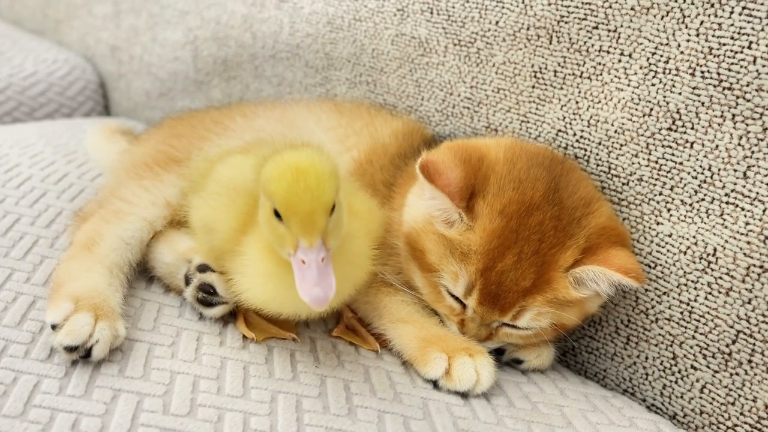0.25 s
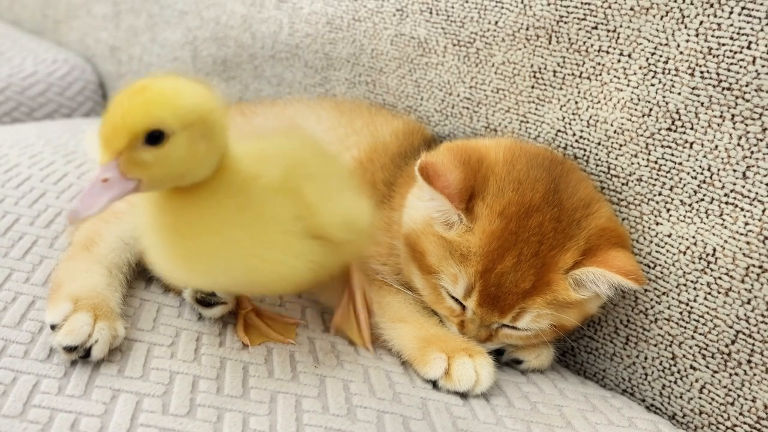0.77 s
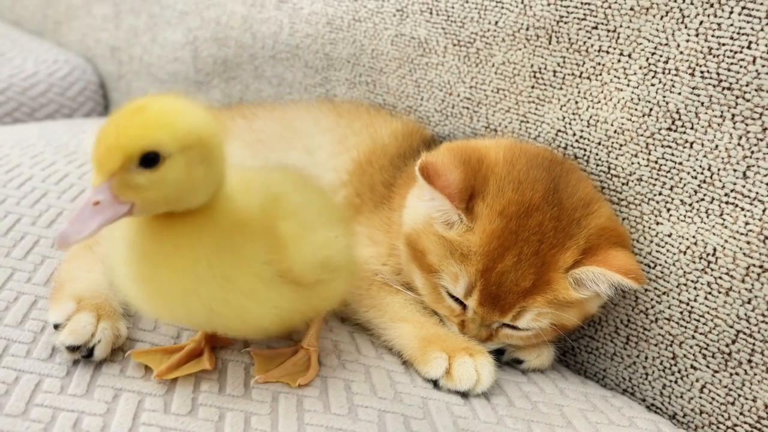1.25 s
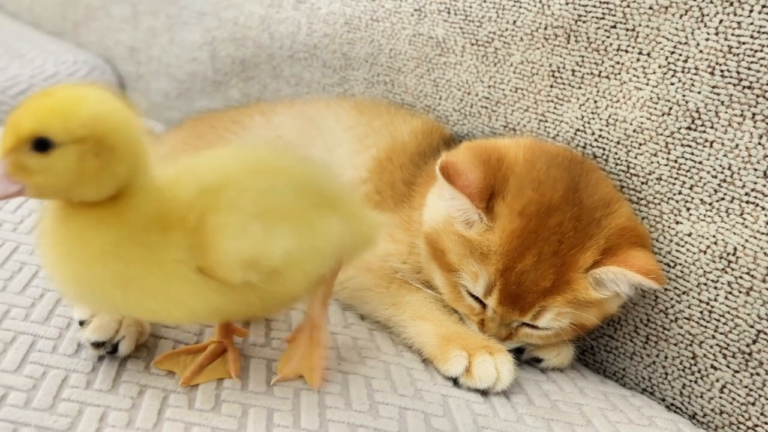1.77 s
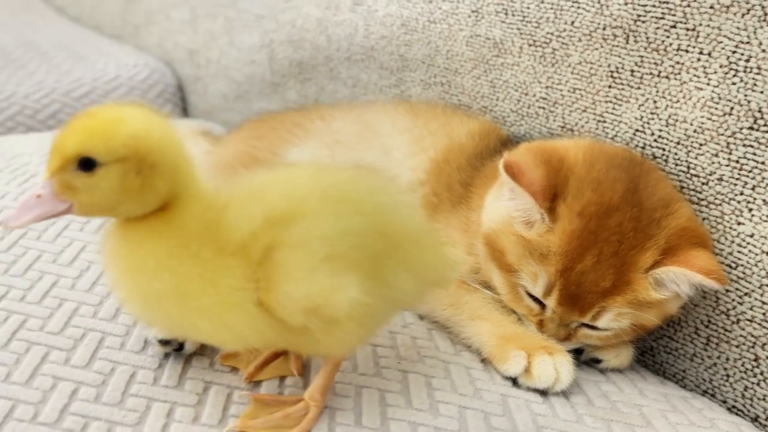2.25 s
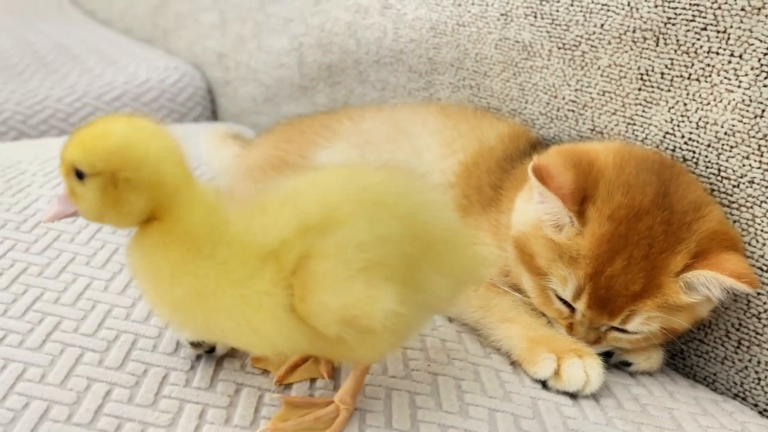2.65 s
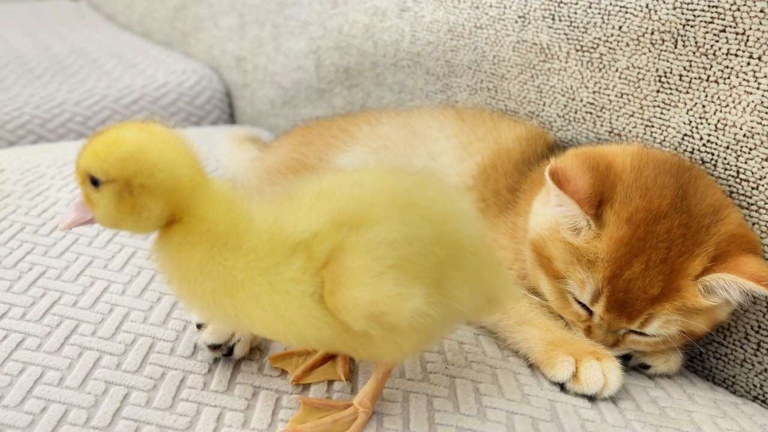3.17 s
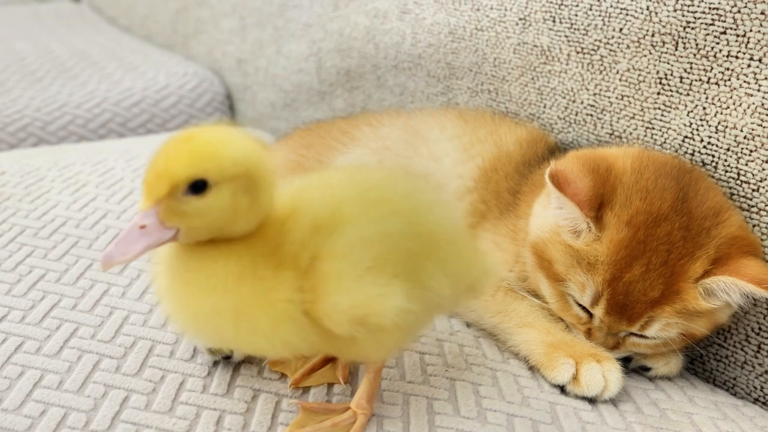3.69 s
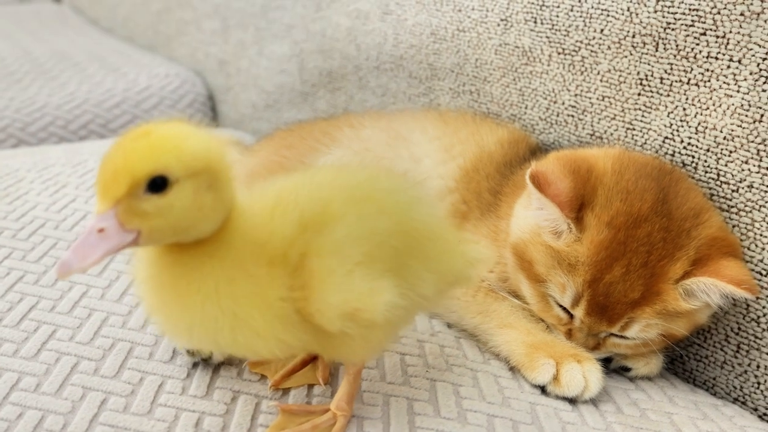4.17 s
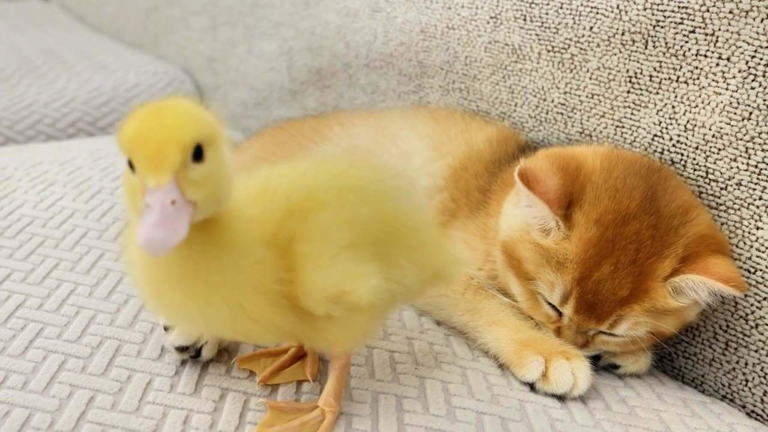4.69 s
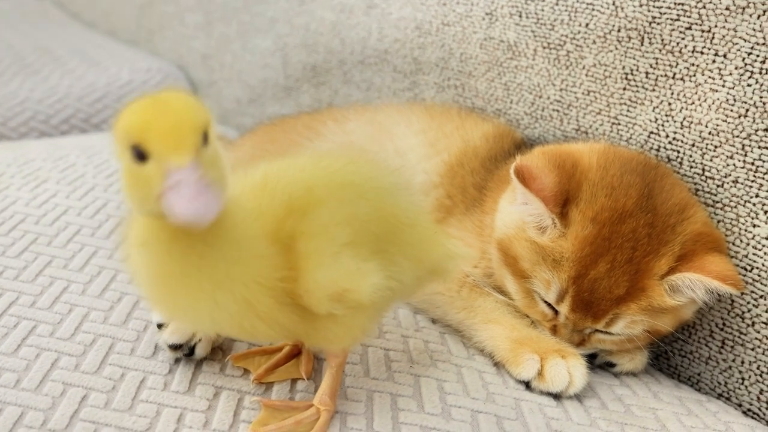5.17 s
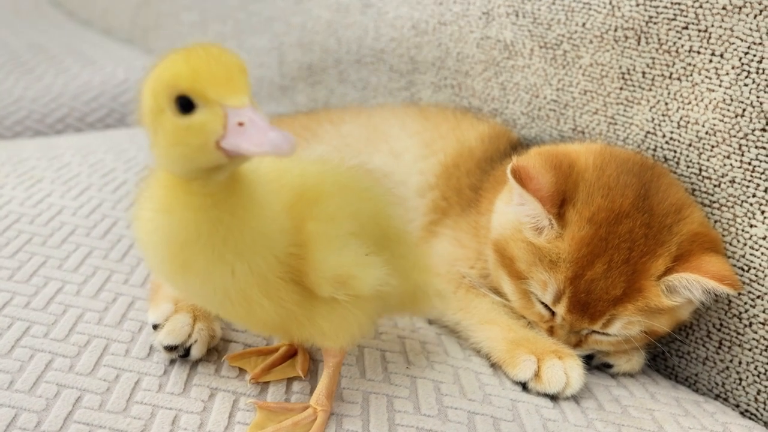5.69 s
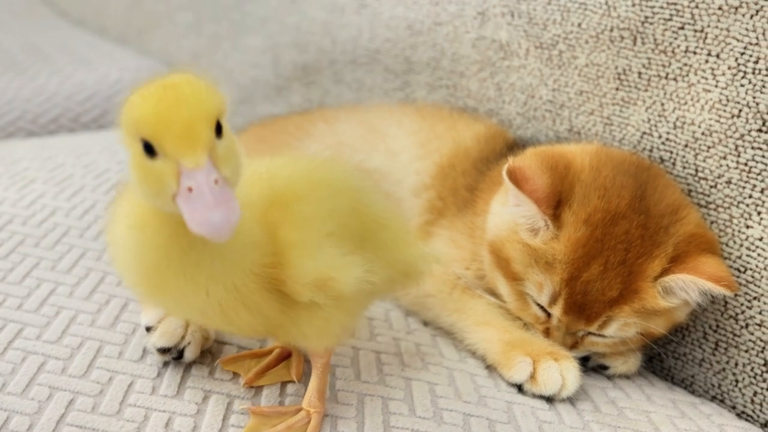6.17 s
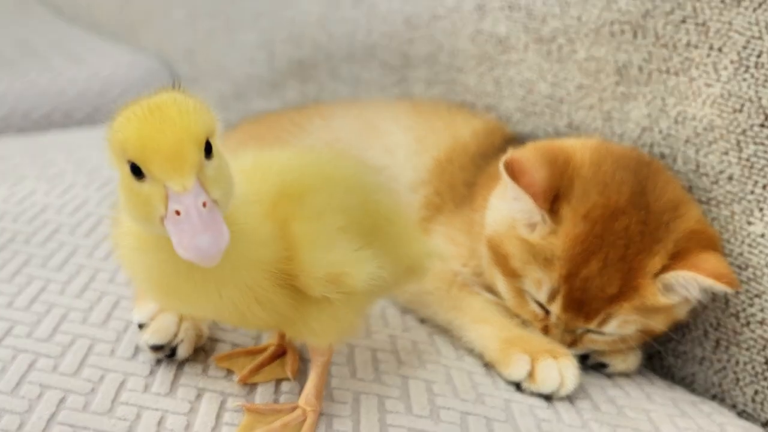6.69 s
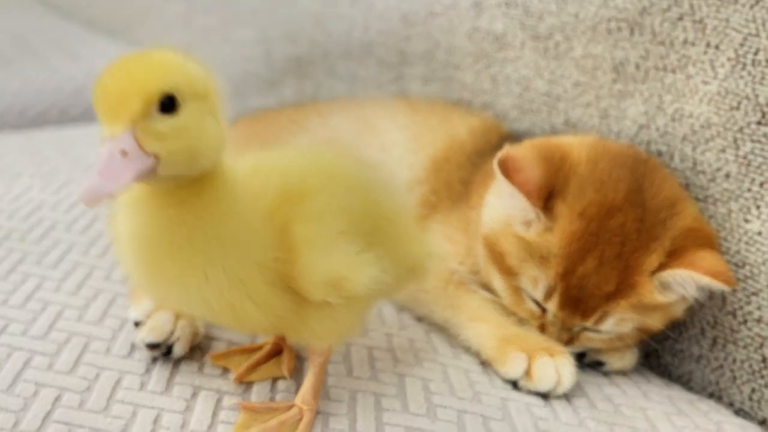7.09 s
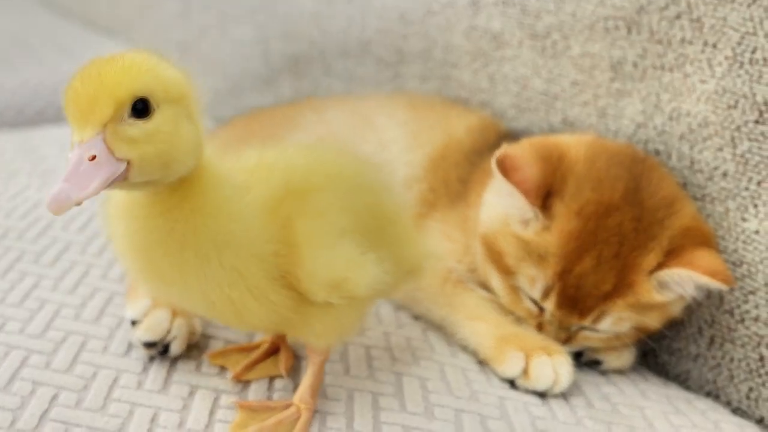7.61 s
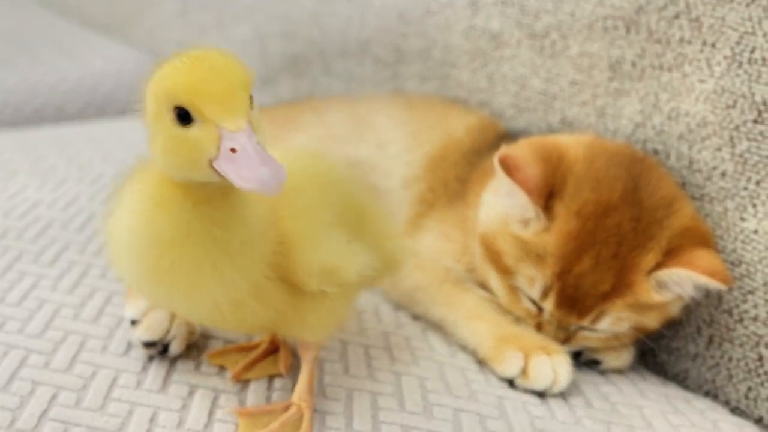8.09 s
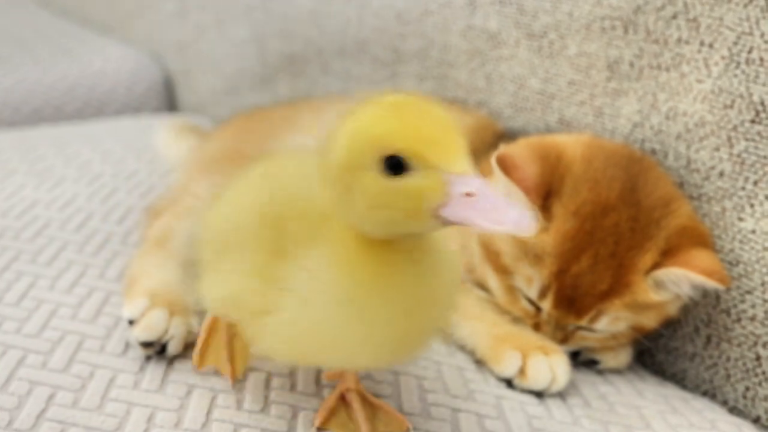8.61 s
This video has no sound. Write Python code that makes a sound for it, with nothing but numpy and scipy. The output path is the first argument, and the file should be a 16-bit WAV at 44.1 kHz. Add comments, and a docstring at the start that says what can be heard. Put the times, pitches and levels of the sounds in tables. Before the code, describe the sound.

Close up on a sofa, a kitten's soft, low purr comes in steady waves beneath a duckling's louder peeping. The quick, high peeps come in a short run, pause, then return in a longer run, a few with a slight scratchy edge. Occasional dull little footsteps land on the cushion, with light room reflections and a faint hiss behind.

```python
"""Living room, on a sofa: a duckling peeps close by; a sleeping kitten purrs softly beside it.
Each peep is a dipping whistle from the two sides of the syrinx, which beat against each other.
Some peeps carry a brief scratchy rasp; webbed feet thud on the cushion now and then. The purr is
larynx pulses ringing throat and chest. Behind them: wall reflections, a thin hiss, still room air."""
import sys
import numpy as np
from scipy import signal
from scipy.fft import rfft, irfft
from scipy.io import wavfile
from scipy.ndimage import map_coordinates

SR = 44100
rng = np.random.default_rng(int(sys.argv[2]) if len(sys.argv) > 2 else 0)


def output_pcm(signal):
    """Save a mono or channel-first signal as 16-bit PCM at the path in sys.argv[1].

    Samples are clipped to [-1, 1] before scaling.
    """
    pcm = np.clip(np.atleast_2d(signal).T, -1, 1) * 32767
    wavfile.write(sys.argv[1], SR, np.round(pcm).astype(np.int16))


N = 390268

# peeps: start_s, length_s, opening_hz, dip_hz, crest_hz, level_db
PEEPS = [(0.1024, 0.073, 3503, 2873, 3244, -22), (0.2913, 0.072, 3445, 2880, 3290, -21.5),
         (0.4856, 0.071, 3414, 2878, 3215, -21.5), (0.6694, 0.071, 3435, 2838, 3110, -23.0),
         (0.8606, 0.07, 3303, 2720, 3064, -25.5), (1.0658, 0.065, 3275, 2685, 3020, -26),
         (1.2518, 0.072, 3276, 2740, 3066, -25), (1.4557, 0.071, 3296, 2690, 3060, -25),
         (1.6725, 0.067, 3370, 2718, 3080, -25.0), (1.8595, 0.067, 3260, 2667, 3045, -26.1),
         (2.0558, 0.071, 3332, 2720, 3090, -26), (2.2729, 0.07, 3323, 2720, 2940, -25.5),
         (3.6, 0.026, 3200, 2670, 2500, -35.5), (3.7032, 0.05, 3417, 2640, 2680, -31),
         (3.9149, 0.065, 3387, 2635, 3150, -28), (4.0402, 0.056, 3350, 2830, 2893, -27),
         (4.24, 0.067, 3350, 2706, 3114, -25.5), (4.425, 0.071, 3354, 2700, 3150, -25.5),
         (4.6117, 0.073, 3260, 2726, 3190, -25), (4.7885, 0.073, 3400, 2780, 3200, -23.5),
         (4.9811, 0.071, 3436, 2773, 3250, -23), (5.1628, 0.072, 3420, 2807, 3205, -23.0),
         (5.3378, 0.074, 3410, 2867, 3290, -22.5), (5.5295, 0.07, 3434, 2884, 3175, -21),
         (5.713, 0.074, 3406, 2867, 3180, -21.5), (5.9006, 0.075, 3460, 2893, 3227, -21),
         (6.081, 0.076, 3400, 2848, 3220, -21.5), (6.2742, 0.073, 3450, 2886, 3290, -21.5),
         (6.471, 0.072, 3400, 2840, 3205, -21.4), (6.7692, 0.06, 3394, 2694, 2890, -24.5),
         (7.1482, 0.058, 3480, 2600, 2730, -26.5), (7.3308, 0.069, 3345, 2730, 3160, -23.5),
         (7.5286, 0.066, 3397, 2730, 3046, -24), (7.7373, 0.07, 3364, 2680, 3040, -24),
         (7.9503, 0.067, 3334, 2683, 3086, -23.5), (8.127, 0.07, 3325, 2762, 3110, -23),
         (8.3231, 0.069, 3280, 2674, 3040, -23.5), (8.5335, 0.064, 3180, 2577, 2877, -26.5),
         (8.7557, 0.069, 3426, 2683, 2826, -24.5)]
# mistuning of the two sides of the syrinx: time_s, gap_hz
MISTUNING = [(0.3, 261), (1.5, 313), (2.2, 244), (3.8, 308), (5.0, 349), (5.8, 406), (7.3, 396),
             (8.85, 330)]
# bill opening, as strength of the top overtones: time_s, level_db
BILL_OPENING = [(0.4, -42), (0.7, -57.5), (1.25, -44.5), (1.5, -46), (4.3, -42.5), (4.7, -32), (5.3, -35),
                (6.3, -33.5), (6.8, -33), (7.5, -35.5), (7.9, -35), (8.15, -34.5), (8.6, -41.5)]
# throat and bill filter on the overtones: freq_hz, gain_db
THROAT_SPECTRUM = [(4600, 5.5), (5400, 0), (6000, -1.5), (6500, 2), (7000, -1), (7800, -21), (8800, -15),
                   (9700, -9), (10500, -10.5), (11500, -20.5), (13000, -4), (13900, 2.5), (14800, -5),
                   (16000, -8)]
# air rasping through the open bill: freq_hz, gain_db
RASP_SPECTRUM = [(1500, -11.5), (3800, 13.5), (5000, -17), (6500, -4.5), (8000, -14.5), (12000, -10.5),
                 (14500, -14)]
# brief scratchy rasps on some peeps: time_s, relative_db
RASP_BURSTS = [(3.921, -70), (4.8734, -64.5), (5.3435, -60), (5.3974, -69), (5.904, -68), (6.086, -72),
               (6.2788, -67), (7.741, -67.5)]
# colour of the brief rasps: freq_hz, gain_db
RASP_BURST_SPECTRUM = [(300, -2.5), (1000, -23.5), (1700, 7), (3000, -8), (5000, 2.5), (9000, -16.5),
                       (16000, -21)]
# purr bouts, breathing in and out by turns: start_s, end_s, pulse_rate_hz
PURR_BOUTS = [(0.021, 0.24, 25.25), (0.263, 0.8, 23.25), (0.899, 1.35, 25.55), (1.417, 1.87, 23.35),
              (2.047, 2.39, 25.0), (2.452, 2.88, 22.3), (2.941, 3.49, 24.75), (3.558, 3.94, 22.0),
              (4.082, 4.62, 23.25), (4.751, 5.16, 20.45), (5.281, 5.75, 22.15), (5.991, 6.49, 20.85),
              (6.583, 7.22, 22.85), (7.365, 7.79, 19.6), (7.905, 8.38, 22.05)]
# second larynx flap, rows for breath in and out: lag_s, relative_db
SECOND_FLAPS = [(0.0123, -4), (0.016, -5)]
# larynx pulse strength: time_s, level_db
PURR_DRIVE = [(0.3, -36.5), (1.6, -35.5), (3.2, -38), (3.8, -37), (6.2, -39.5), (8.2, -39)]
# kitten's throat and chest modes: freq_hz, gain_db, t60_s
PURR_MODES = [(97, -25.5, 0.072), (175, -16, 0.034), (308, -4, 0.019), (540, -3, 0.0035), (720, -15, .007)]
# webbed feet on the cushion: start_s, level_db, corner_hz, decay_s
STEPS = [(.95, -38, 743, 0.0052), (0.992, -49.5, 424, 0.057), (1.261, -35.5, 160, 0.019),
         (1.897, -39.5, 250, 0.12), (2.556, -36.5, 610, 0.0033), (2.712, -42, 900, .004),
         (5.985, -42.5, 386, 0.011), (6.787, -42, 200, 0.03), (7.392, -28.5, 270, 0.0064),
         (8.199, -45.5, 260, 0.021), (8.507, -27.5, 222, 0.012), (8.842, -31.5, 240, 0.0056)]
# wall reflections: freq_hz, gain_db
ROOM_SPECTRUM = [(100, 9.5), (1000, -1), (2300, -4.5), (2800, -2.5), (3400, -3), (5000, -3), (7000, -13),
                 (16000, -20)]
# swells of the thin hiss: time_s, level_db
HISS_LEVEL = [(.14, -77), (.22, -52.5), (.4, -71.5), (4.5, -85), (6.1, -57), (6.95, -64.5), (7.08, -58),
              (8.85, -65)]
# hiss band near 4 kHz: freq_hz, gain_db
HISS_SPECTRUM = [(3000, -43), (3650, -2.5), (3900, -2.5), (4150, -11), (4600, -42)]
# still room air: freq_hz, gain_db
AIR_SPECTRUM = [(15, -34), (25, 1), (76, 1), (133, -3), (261, -2), (710, -14), (1820, -20), (3300, -22),
                (3990, -23.5), (14600, -27.5), (15800, -32)]

# place, *_at and *_width are fractions of a peep's length
DIP_S, USUAL_DIP_HZ, CLASH_AT, WIDE_BILL_DB = 0.034, 2750, 0.43, -32.5


def duckling():
    """A run of peeps, each with its own pitch course and strength."""
    out = np.zeros(N)
    for start_s, *row in PEEPS:
        add(out, start_s, peep(start_s, *row))
    return out


def peep(start_s, length_s, opening_hz, dip_hz, crest_hz, level_db, attack_s=0.0022, soft_db=-25):
    """Two membranes whistle in one airflow, part early and clash most around the dip."""
    t = np.arange(SR // 10) / SR
    place = t / length_s
    pitch_hz = glide_hz(place, length_s, opening_hz, dip_hz, crest_hz) * (1 + 0.003 * wander(t, 500))
    full_gap_hz = in_time(MISTUNING, start_s) + 0.57 * (USUAL_DIP_HZ - dip_hz)
    gap_hz = full_gap_hz * ramp(place, 0.09, 0.224) * (1 + 0.076 * wander(t, 90))
    beat_rad = 2 * np.pi * (np.cumsum(gap_hz) / SR + rng.random())
    swell_db = 9 * bump(place, CLASH_AT, 0.22)
    upper_scatter_db, bill_scatter_db = rng.standard_normal(2)
    dropout_db = 1.9 * min(level_db - soft_db, 0)   # soft peeps lose the upper voice
    wave = syrinx(pitch_hz, beat_rad, upper_db=-17.5 + upper_scatter_db + swell_db + dropout_db)
    bill_db = in_time(BILL_OPENING, start_s) + bill_scatter_db
    clash = from_db(swell_db - 12)
    treble = overtones(t, np.angle(wave), pitch_hz, gap_hz, beat_rad, clash, bill_db)
    treble += rasp(t, pitch_hz, bill_db)
    voice = wave.real + ramp(t, 0, 0.004) * np.sqrt(np.abs(wave)) * treble
    onset = np.sin(np.pi / 2 * ramp(t, 0, attack_s)) ** 2
    return np.sqrt(2) * from_db(level_db) * breath(place, opening_hz - dip_hz) * onset * voice


def syrinx(pitch_hz, beat_rad, upper_db, coupling=0.16):
    """Joint complex wave of both sides; each tugs at the other, adding faint sidebands."""
    upper = from_db(upper_db)
    lower_voice = np.exp(2j * np.pi * np.cumsum(pitch_hz) / SR)
    beating = 1 + upper * np.exp(1j * beat_rad)
    tug = 1 + 2 * coupling * upper * np.cos(beat_rad)
    return lower_voice * beating * tug / np.sqrt(1 + upper ** 2)


def glide_hz(place, length_s, opening_hz, dip_hz, crest_hz, crest_at=0.77, end_at=1.075, flatness=1.135):
    """Pitch hooks up, dips, crests again, then slides down as the pressure goes."""
    top_at = max(0.062 + 4.0 * (length_s - 0.07), 0.02)   # long peeps climb longer
    dip_at = min(DIP_S / length_s, 0.58)
    end_hz = 2247 + 0.31 * (dip_hz - USUAL_DIP_HZ)
    turn = np.interp(place, [top_at, dip_at, crest_at, end_at], np.arange(4))
    eased = np.floor(turn) + (1 - np.cos(np.pi * (turn % 1))) / 2
    from_dip = np.minimum(np.abs(eased - 1), 1)
    eased += np.sign(eased - 1) * (from_dip ** flatness - from_dip)   # linger in the dip
    hook_hz = 1500 * np.maximum(top_at - place, 0) ** 2 / top_at
    return np.interp(eased, np.arange(4), [opening_hz, dip_hz, crest_hz, end_hz]) - hook_hz


def breath(place, drop_hz, hold_db=-0.2, release_at=0.7, silent_at=1.0366, sag_db_per_hz=0.0231):
    """Peep envelope: push, hold, rounded release; a deep pitch drop also sags in level."""
    push_db = 3.5 * bump(place, centre_at=0.27, hill_width=0.13)
    sag_db = sag_db_per_hz * (drop_hz - 620) * (place - CLASH_AT)
    release = 1 - ramp(place, release_at, silent_at) ** 1.34
    return from_db(hold_db + push_db - sag_db) * release


def overtones(t, phase_rad, pitch_hz, gap_hz, beat_rad, clash, bill_db, fade_db_per_s=39):
    """Harmonics 2-5 through throat and bill, strongest at high pressure and so high pitch."""
    # a clash pulls the octave towards the sum tone, splits it and weakens the higher harmonics
    pull_rad = 2 * np.pi * np.cumsum(gap_hz * np.minimum(clash, 1) ** 1.4) / SR
    splitting = 1 + 0.28 * clash * np.cos(beat_rad)
    blur_db = -8 * (clash - 0.5)
    octave_db = -21.5 + 0.4 * (bill_db - WIDE_BILL_DB)
    octave = from_db(octave_db) * np.cos(2 * phase_rad + pull_rad) * splitting
    levels_db = [octave_db - 1 + blur_db, bill_db + 2 + blur_db, bill_db - 6]
    higher = sum(from_db(db) * np.cos(k * phase_rad) for k, db in enumerate(levels_db, 3))
    pressure_db = 0.0043 * (pitch_hz - 3235) - fade_db_per_s * (t - DIP_S)
    return coloured(octave + higher, THROAT_SPECTRUM) * from_db(pressure_db)


def rasp(t, pitch_hz, bill_db, attack_s=0.004, fade_db_per_s=68.5):
    """Air rasps through the bill, more when it is wide open and the pressure is high."""
    opening_db = -27.5 + 0.56 * (bill_db - WIDE_BILL_DB)
    pressure_db = 0.002 * (pitch_hz - 3370) - fade_db_per_s * t
    return from_db(opening_db + pressure_db) * ramp(t, 0, attack_s) * noise(RASP_SPECTRUM, len(t))


def purr(taper_db=1.0, jitter_s=0.00057):
    """The kitten's larynx flaps twice a cycle, ringing throat and chest; fur muffles the top."""
    flaps = np.zeros(N)
    for bout, (start_s, end_s, rate_hz) in enumerate(PURR_BOUTS):
        lag_s, second_db = SECOND_FLAPS[bout % 2]
        times_s = np.arange(start_s, end_s, 1 / rate_hz)
        scatter = rng.standard_normal((40, 4))
        for time_s, (slip1, slip2, scatter1_db, scatter2_db) in zip(times_s, scatter):
            arch = np.sin(np.pi * (time_s - start_s) / (end_s - start_s)) - 2 / np.pi
            pulse_db = in_time(PURR_DRIVE, time_s) + taper_db * arch
            add(flaps, time_s + jitter_s * slip1, from_db([pulse_db + scatter1_db]))
            add(flaps, time_s + lag_s + jitter_s * slip2, from_db([pulse_db + second_db + scatter2_db]))
    body = sum(from_db(db) * ring(flaps, hz, t60_s) for hz, db, t60_s in PURR_MODES)
    fur = signal.butter(5, [70, 1000], "band", fs=SR, output="sos")
    return signal.sosfilt(fur, body)


def footsteps(attack_s=0.002):
    """A foot pushes into the cushion: a short dull rumble with a little scuff."""
    out, t = np.zeros(N), np.arange(SR // 2) / SR
    shape = [(1 / 8, -12), (0.7, 2), (0.73, 0), (1.5, -14), (3, -25), (8, -56)]   # corner_ratio, gain_db
    for start_s, level_db, corner_hz, decay_s in STEPS:
        rumble = noise([(corner_hz * ratio, db) for ratio, db in shape], len(t))
        envelope = ramp(t, 0, attack_s) * np.exp(-t / decay_s)
        add(out, start_s, from_db(level_db) * rumble * envelope)
    return out


def rasp_bursts(gain_db=18.0, decay_s=0.0063):
    """Brief scratchy rasps, mostly at the onset or crest of a peep."""
    out, t = np.zeros(N), np.arange(1024) / SR
    for time_s, relative_db in RASP_BURSTS:
        burst = noise(RASP_BURST_SPECTRUM, len(t)) * np.exp(-t / decay_s)
        add(out, time_s, from_db(relative_db + gain_db) * burst)
    return out


def room(near, t60_s=0.67, build_s=0.0034, wet_db=-22, lingering_db=-52):
    """Diffuse wall reflections build and die away; at the start an earlier peep still rings."""
    t = np.arange(SR) / SR
    envelope = from_db(-60 * t / t60_s) * (1 - np.exp(-t / build_s))
    tail = noise(ROOM_SPECTRUM, len(t)) * envelope
    peep_band = np.abs(rfft(tail))[2700:3400]   # one bin per Hz
    tail /= np.sqrt(np.mean(peep_band ** 2))
    reflections = from_db(wet_db) * signal.fftconvolve(near, tail)[:N]
    lingering = noise([(2300, -50.5), (2850, -3.5), (3400, -10.0), (4100, -51)], N)
    return reflections + lingering * from_db(lingering_db - 60 * np.arange(N) / SR / t60_s)


def background(air_db=-57.5):
    """A thin hiss swells and fades over the still air of the room."""
    hiss = from_db(in_time(HISS_LEVEL, np.arange(N) / SR)) * noise(HISS_SPECTRUM, N)
    return hiss + from_db(air_db) * noise(AIR_SPECTRUM, N)


def from_db(db):
    """Decibels to gain."""
    return 10 ** (np.asarray(db) / 20)


def coloured(x, spectrum):
    """Filter by (freq_hz, gain_db) points on a log-frequency axis."""
    freq_hz, gain_db = np.transpose(spectrum)
    bins_hz = np.maximum(np.fft.rfftfreq(len(x), 1 / SR), 1)
    bins_db = np.interp(np.log(bins_hz), np.log(freq_hz), gain_db)
    return irfft(rfft(x) * from_db(bins_db), len(x))


def noise(spectrum, size):
    """Coloured noise, rms 1."""
    x = coloured(rng.standard_normal(size), spectrum)
    return x / x.std()


def wander(t, rate_hz):
    """Smooth random wobble, spread about 1."""
    return map_coordinates(rng.standard_normal(256), [t * rate_hz], order=3, mode="wrap")


def ring(clicks, freq_hz, t60_s):
    """Resonator: a unit click starts a decaying sine of height 1."""
    radius = np.exp(-np.log(1000) / (t60_s * SR))
    step_rad = 2 * np.pi * freq_hz / SR
    feedback = [1, -2 * radius * np.cos(step_rad), radius ** 2]
    return signal.lfilter([0, np.sin(step_rad)], feedback, clicks + 1e-18)


def add(out, start_s, sound):
    """Mix a sound in at start_s."""
    i = min(max(round(start_s * SR), 0), N)
    out[i:i + len(sound)] += sound[:N - i]


def in_time(curve, time_s):
    """Control curve value at time_s."""
    return np.interp(time_s, *np.transpose(curve))


def bump(place, centre_at, hill_width):
    """Gaussian hill, height 1."""
    return np.exp(-((place - centre_at) / hill_width) ** 2)


def ramp(x, start, end):
    """Linear rise from 0 to 1."""
    return np.clip((x - start) / (end - start), 0, 1)


def scene():
    """Duckling and kitten up close, the room behind them; mono."""
    near = duckling() + purr() + footsteps() + rasp_bursts()
    return (near + room(near) + background())[None]


def record(dry, cutoff_hz=16000):
    """Steep low-pass."""
    return signal.sosfilt(signal.ellip(10, 0.1, 80, cutoff_hz, fs=SR, output="sos"), dry)


dry = scene()
out = record(dry)
output_pcm(out)
```